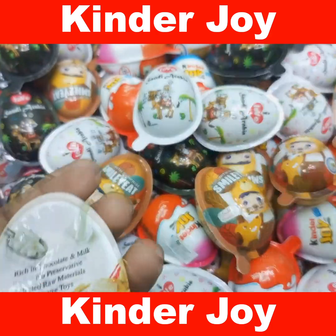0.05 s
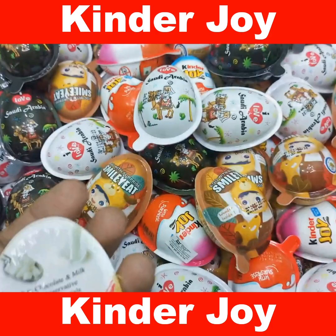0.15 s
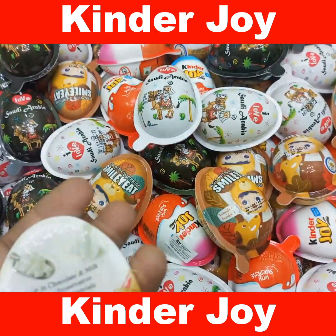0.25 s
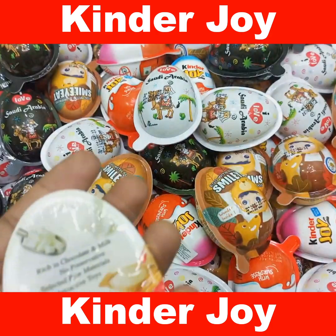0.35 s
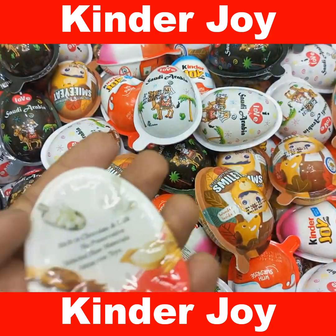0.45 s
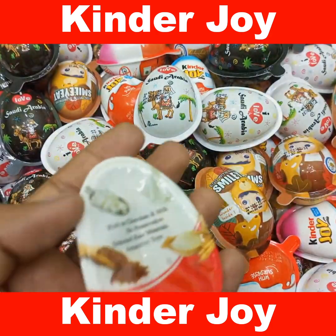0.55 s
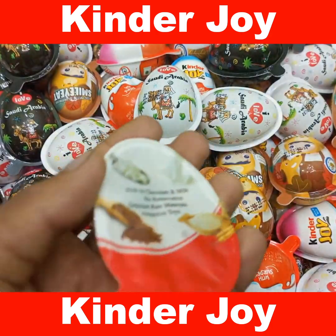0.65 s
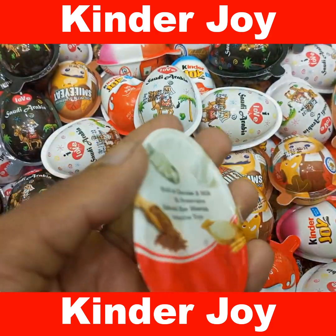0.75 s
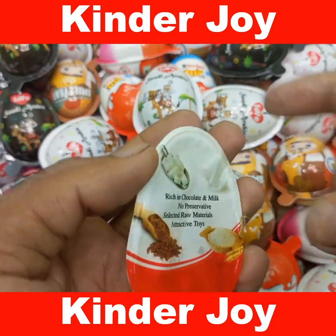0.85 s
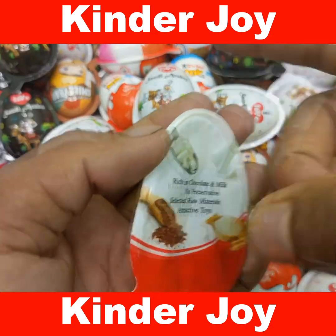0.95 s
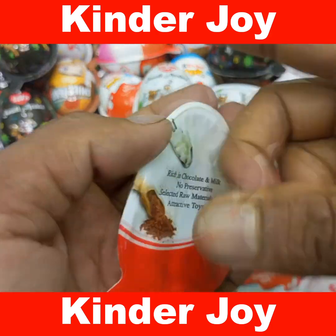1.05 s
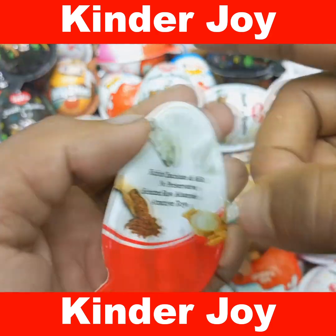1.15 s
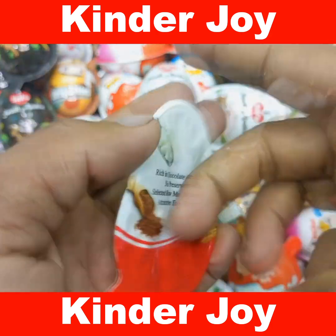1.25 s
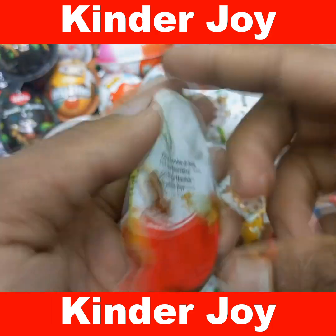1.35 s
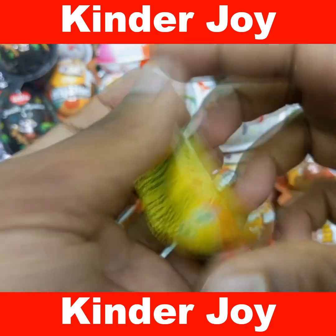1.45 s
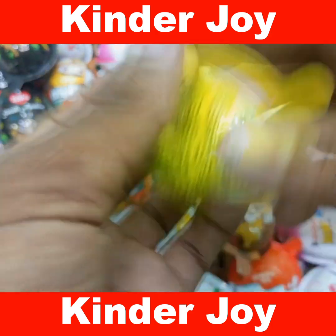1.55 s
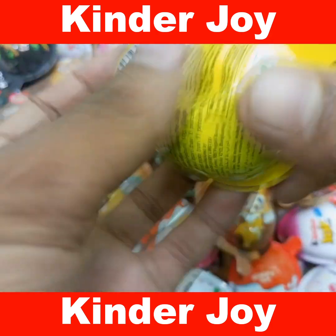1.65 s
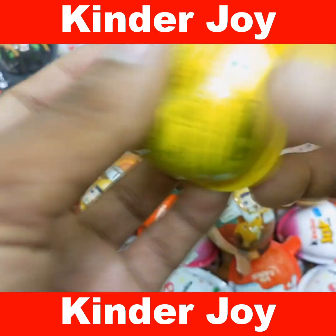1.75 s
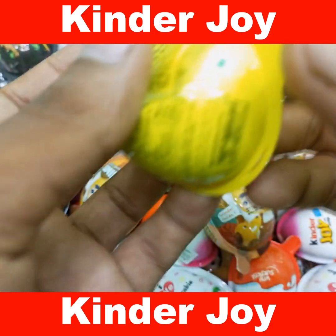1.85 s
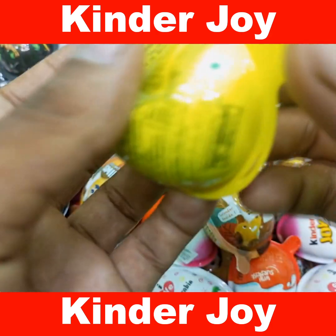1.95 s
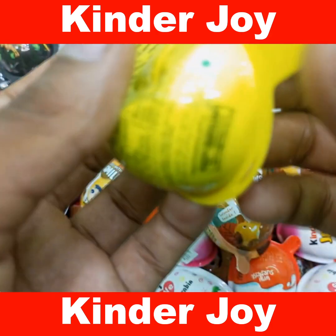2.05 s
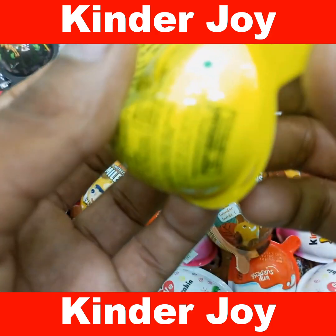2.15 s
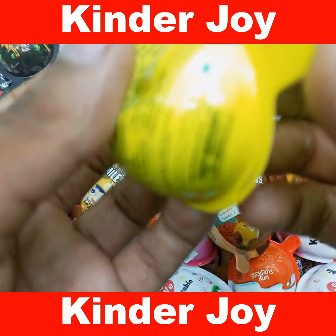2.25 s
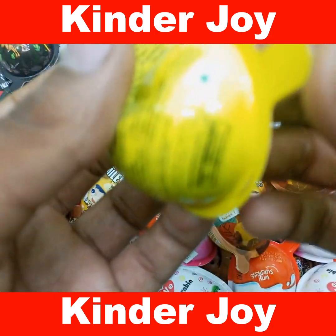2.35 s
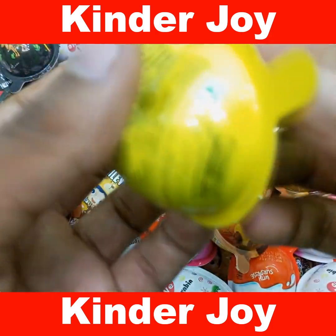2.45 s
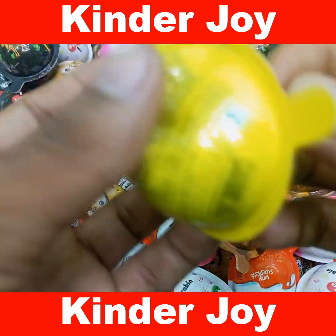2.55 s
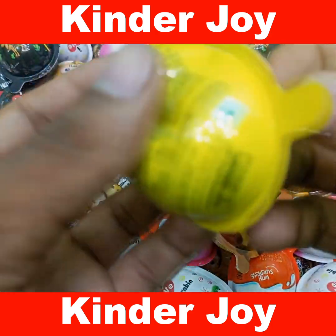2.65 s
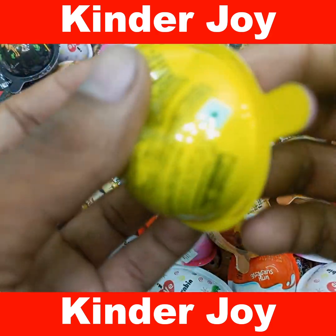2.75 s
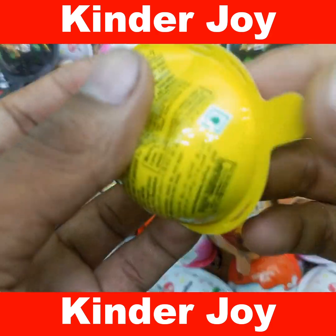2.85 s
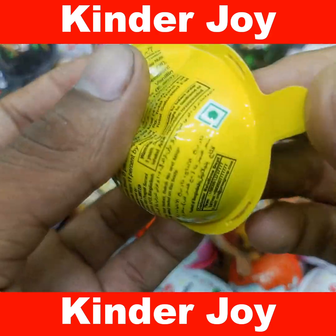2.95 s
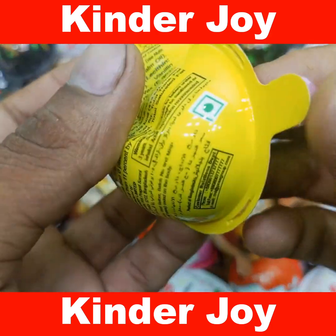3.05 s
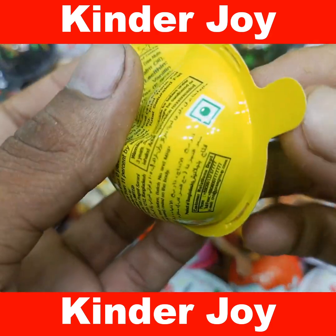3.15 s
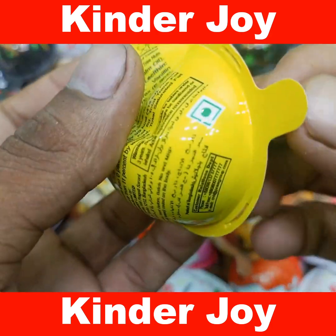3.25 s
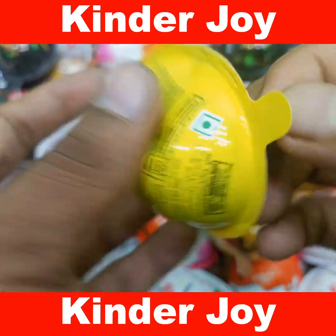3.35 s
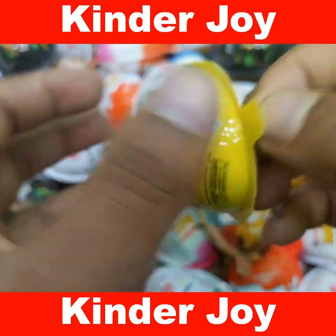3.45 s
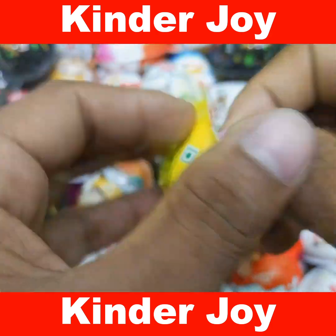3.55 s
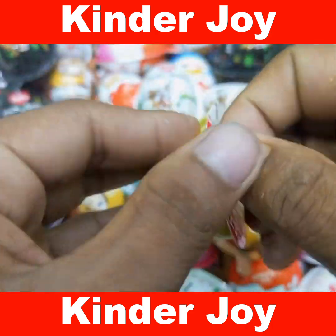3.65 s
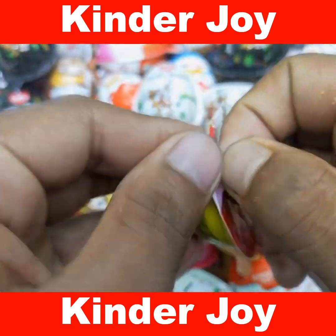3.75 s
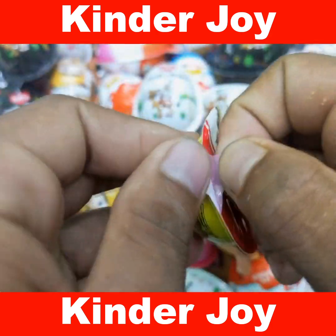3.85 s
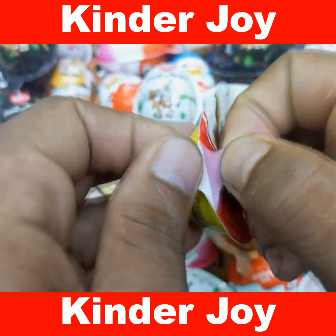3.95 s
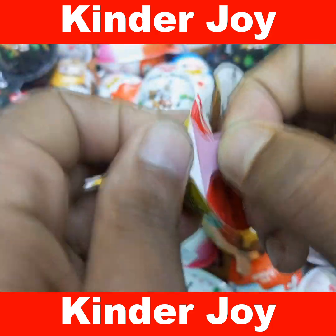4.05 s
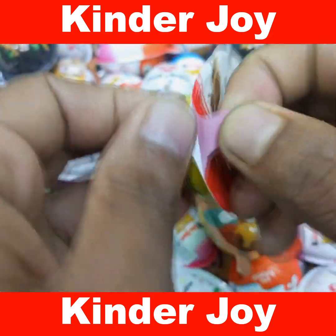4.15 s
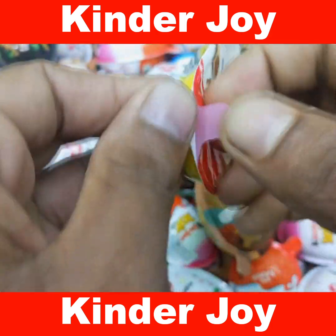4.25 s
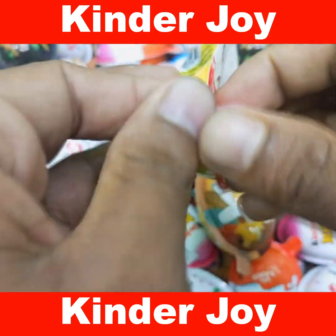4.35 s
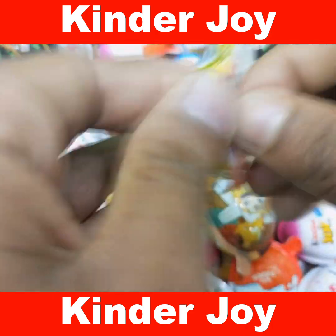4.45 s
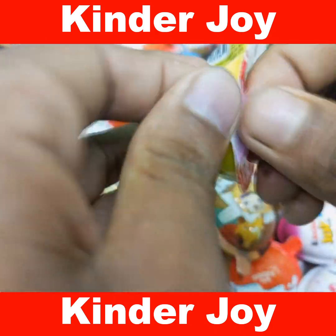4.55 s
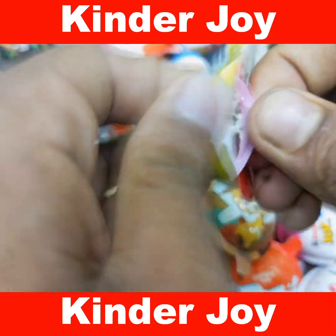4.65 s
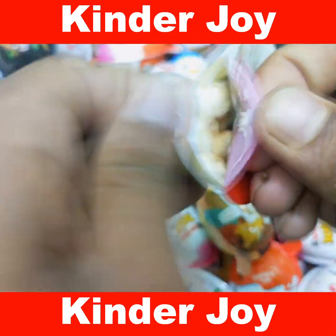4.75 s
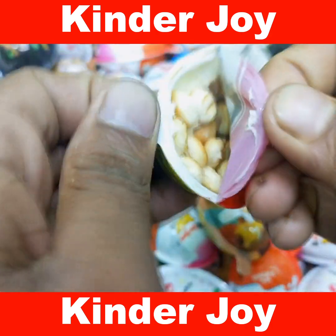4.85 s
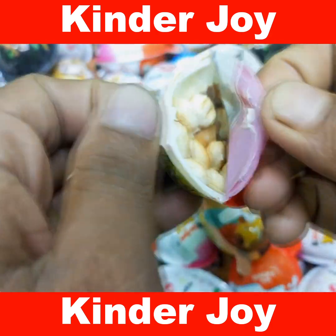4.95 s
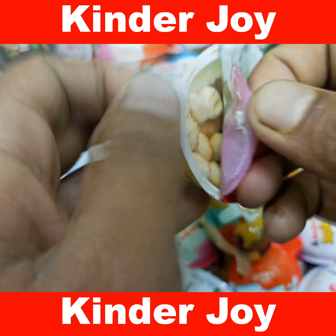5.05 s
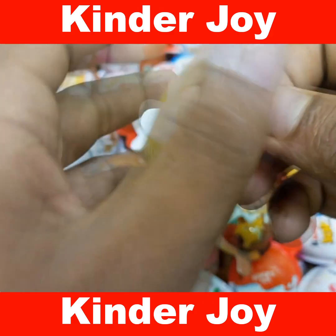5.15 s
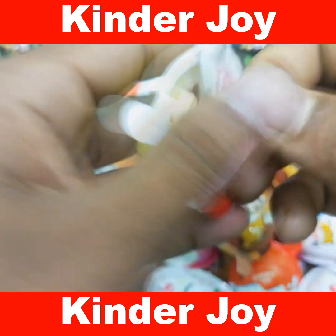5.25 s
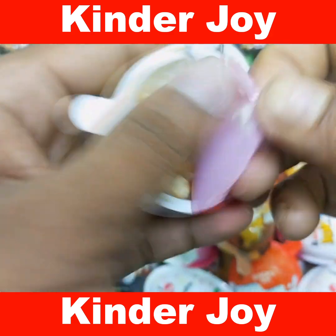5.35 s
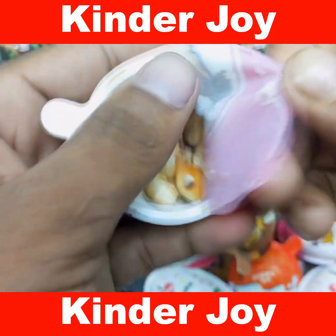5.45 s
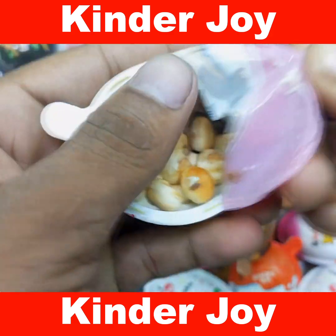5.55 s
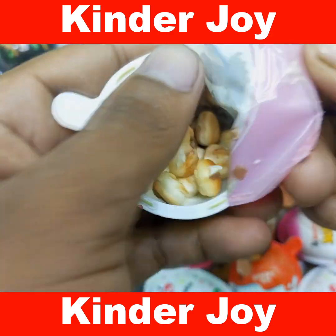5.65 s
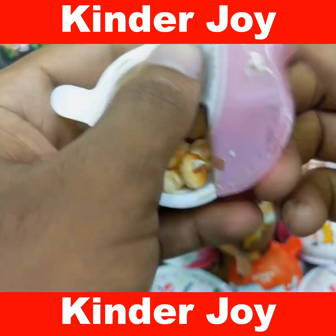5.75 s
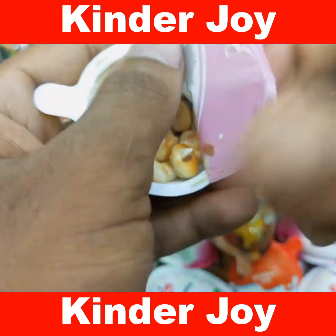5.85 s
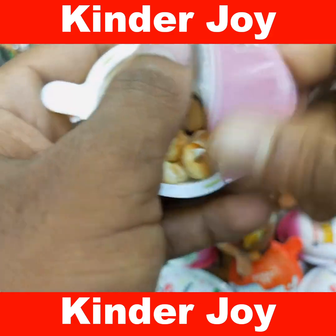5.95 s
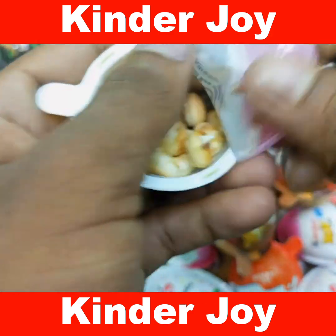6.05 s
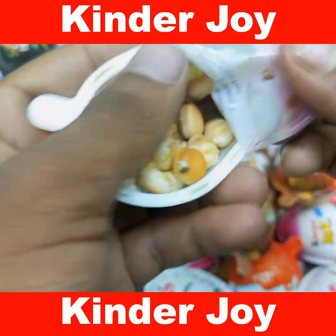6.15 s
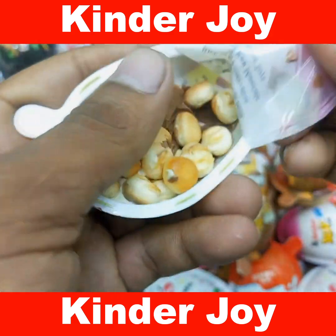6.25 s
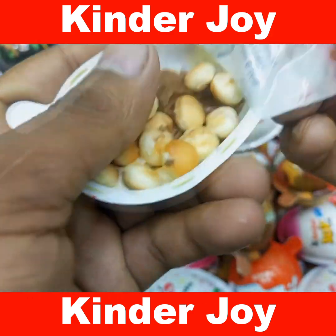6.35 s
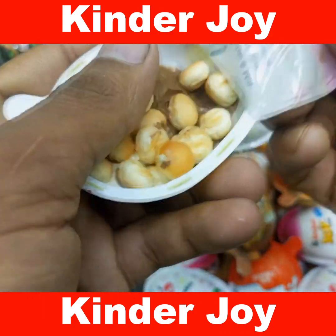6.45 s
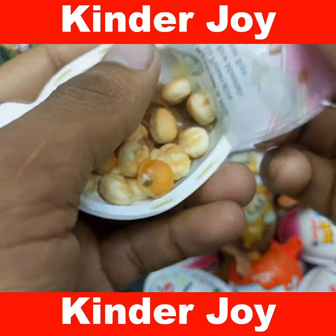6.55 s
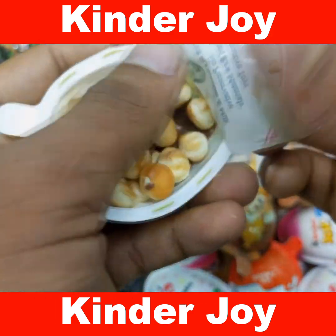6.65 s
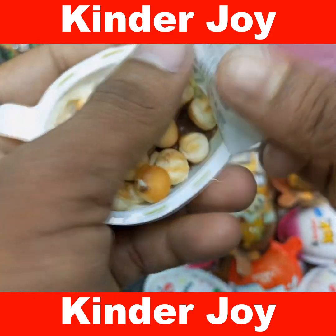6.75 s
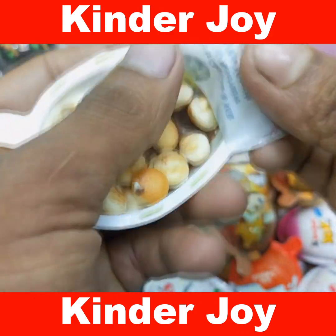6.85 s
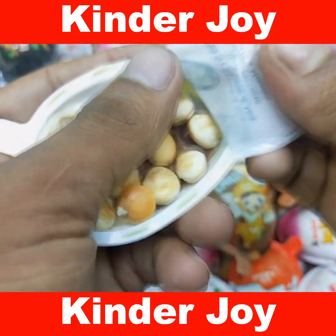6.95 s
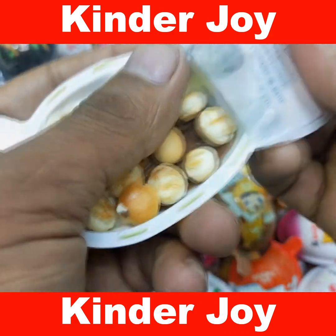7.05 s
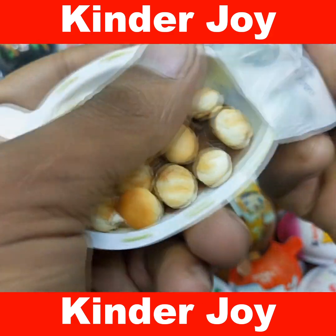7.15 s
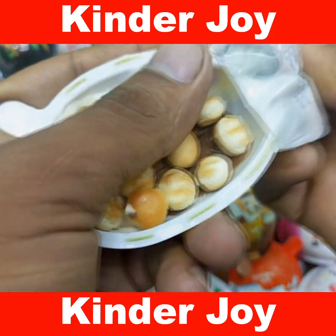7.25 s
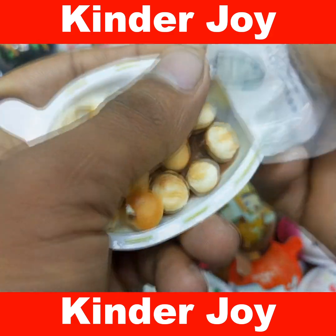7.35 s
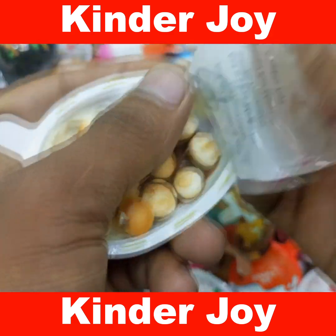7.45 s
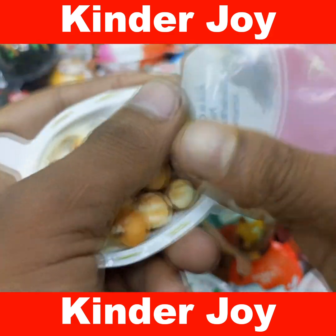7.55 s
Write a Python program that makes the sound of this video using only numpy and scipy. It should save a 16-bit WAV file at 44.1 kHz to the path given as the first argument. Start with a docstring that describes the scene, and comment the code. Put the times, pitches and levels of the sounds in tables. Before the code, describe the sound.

Two sharp plastic snaps, then a foil lid peeling off a small hollow egg cup in dense, quick crackles, close up in a small room.

```python
"""A low hum sinks away over faint room noise and a few light crackles, then two sharp snaps:
hands crack a plastic egg into its halves, close to the microphone in a small room.
The foil lid is peeled back, buckling and tearing in quick crackles, and fingers rub the cup.
Snaps and buckles are tiny-slip noise runs through resonances; crinkles are crowds of pitched ticks;
rubs are filtered noise, the hum is a sine, and echoes plus a diffuse tail form the room."""
import sys
import numpy as np
from scipy import signal
from scipy.fft import rfft, irfft
from scipy.io import wavfile
from scipy.ndimage import uniform_filter1d, minimum_filter1d

SR = 44100
rng = np.random.default_rng(int(sys.argv[2]) if len(sys.argv) > 2 else 0)


def pcm_store(signal):
    """Save signal as 16-bit PCM."""
    levels = np.round(np.clip(np.atleast_2d(signal), -1, 1) * 32767)
    wavfile.write(sys.argv[1], SR, levels.astype(np.int16).T)


N = 336042
TAPS = 2048  # length of the short pulses [samples]
HZ = np.fft.rfftfreq(TAPS, 1 / SR)
TIME = np.arange(N) / SR


# The egg's seam breaks:
# (time [s], crack level [dB], crack length scale [ms], cup thump level [dB], thump pitch [Hz])
SEAM_SNAPS = [(1.1164, 24, 1, 32, 137.6), (1.3619, 29, 0.82, 30.5, 158.3)]
# Colour of the first crack: (frequency [Hz], level [dB])
FIRST_CRACK_COLOUR = [(100, -30.5), (400, -22.5), (620, -3.5), (870, -12), (1400, -11.5), (1750, 7),
                      (2400, -4.5), (3100, 1), (3800, -6.5), (4400, -5), (6500, -7.5), (10500, -10),
                      (16000, -8)]
# Colour of the second crack: (frequency [Hz], level [dB])
SECOND_CRACK_COLOUR = [(100, -14.5), (320, -4.5), (550, 3), (1000, -8.5), (1400, 1), (1900, -2), (2350, 0),
                       (3200, -5.5), (3900, -10), (6500, -7), (10000, -12), (16000, -16)]


def snaps(thump_q=0.9):
    """The seam gives way: a crack through the shell and a low thump of the hollow cup."""
    out = np.zeros(N)
    colours = [FIRST_CRACK_COLOUR, SECOND_CRACK_COLOUR]
    for (s, crack_db, ms, thump_db, thump_hz), colour in zip(SEAM_SNAPS, colours):
        crack = signal.fftconvolve(slips(ms), causal(amp(read(colour, HZ))))
        thump = causal(resonance(HZ, thump_hz, thump_q) ** 2)
        add(out, s, amp(crack_db) * crack)
        add(out, s, amp(thump_db) * thump)
    return out


# Modes of the hollow halves: (pitch [Hz], level [dB], time to die by 60 dB [s])
CUP_MODES = [(1690, -45.5, 0.84), (1765, -52, 0.5), (1850, -45.5, 0.3), (2930, -45, 0.45), (4740, -49, .35),
             (5900, -49, .35), (7210, -51, 0.38)]


def cup_ring(buckles, coupling_db=-28):
    """The modes of the shell ring on, set off by each snap and, more weakly, by the buckling foil."""
    t = TIME[:SR]
    ring = sum(amp(db - 60 * t / t60) * np.sin(2 * np.pi * hz * t) for hz, db, t60 in CUP_MODES)
    out = amp(coupling_db) * signal.fftconvolve(buckles, ring)[:N]
    for s, *_ in SEAM_SNAPS:
        add(out, s, ring)
    return out


SECOND_RING_DB = -2  # second ring relative to the main one


def rings(db, main_hz, second_hz, q):
    """Magnitude spectrum of the two heavily damped modes of a buckling patch."""
    main = resonance(HZ, main_hz, q) ** 3
    second = amp(SECOND_RING_DB) * resonance(HZ, second_hz, q) ** 3
    return amp(db) * np.hypot(main, second)


# Foil and cup buckle:
# (time [s], ring level [dB], main ring [Hz], second ring [Hz], crack level [dB], length scale [ms])
BUCKLES = [(0.0879, -0.5, 1700, 2640, -16, 1.4), (0.6521, -6, 3860, 6600, -20.5, 8.1),
           (1.1801, 7, 1900, 2970, -5, 1.0), (1.4081, -4, 1640, 1980.0, 0, 1.5),
           (1.4137, 0, 1390.0, 5170, 4.5, 1.4), (1.6825, -4.5, 2060, 11200, -16.5, 0.86),
           (1.915, 3.5, 1590, 3870, -9, 2.5), (2.0152, 6, 1450, 5200, -10.5, 2.1),
           (2.4351, -9.5, 2130, 4840, -19.5, 1.9), (2.7745, -10, 7800, 14100, -17.5, 1.8),
           (3.2495, -1, 5930, 4700, -11.5, 1.2), (3.4857, -8.5, 1570, 3300, -25.5, 3),
           (3.5378, -14, 1820, 3530, -37, 3), (3.699, -14, 1600, 3000, -32, 5.4),
           (3.803, -7.5, 12030.0, 12020.0, -34, 0.75), (3.8461, -18.5, 3810, 11300, -42, 7.7),
           (4.0753, -11, 2380, 5260.0, -20.5, 2.6), (4.1112, 4.5, 1840.0, 2090, -48, 0.39),
           (4.1265, 3.5, 1940.0, 2200, -2, 0.84), (4.3431, -0.5, 2040, 4220, -22, 2.4),
           (4.463, 1, 1540, 3800, -21.5, 1.5), (4.498, 2.5, 1910.0, 1910.0, -9.5, 1.6),
           (4.548, -7.5, 5600, 6700, -13.5, 4.7), (4.716, -1.5, 960.0, 3520.0, -40, 2),
           (4.7278, 4, 1910, 10900, -2, 0.52), (4.7392, -0.5, 1450, 1640, -9, 4.1),
           (4.8112, 0.5, 4870, 9500, -6, 0.95), (4.8156, -1.5, 4890.0, 13730.0, -22, 0.44),
           (4.829, 3.5, 1700.0, 13700, -8, 1.8), (4.833, 0, 4160, 10400, -4, 1.9),
           (4.8707, 3.5, 5840.0, 13000, -3.5, 1.2), (4.8997, 10, 3340.0, 7450, 5.5, 2),
           (4.9304, -3, 1900, 4080, -6, 1.4), (4.9364, 10, 1830, 4400, -1, 0.98),
           (4.9621, 13.5, 1440, 3340, 3.5, 1.04), (4.9789, -4, 3800, 9600, -6, 1.2),
           (5.0253, 8.5, 1630, 3130, -6, 0.54), (5.0757, -8, 1670.0, 8850, -10.5, 3.2),
           (5.1195, 3, 1830.0, 2970, 4, 1.9), (5.1527, -2.5, 1830, 3780, -10, 0.78),
           (5.1622, -4, 2350.0, 8700, -11, 2.4), (5.395, 0, 2030, 3700.0, -8.5, 0.62),
           (5.4255, -6.5, 1800, 4400, -26, 6.9), (5.45, 12.5, 2030, 2330, -8, 0.56),
           (5.4927, 8.5, 1510, 4060, 0.5, 1.5), (5.5306, 2.5, 3680, 4530, -8, 0.66),
           (5.5341, 5, 4700, 15030.0, -4, 1.1), (5.552, 13, 1750, 2270.0, 2.5, 1.3),
           (5.6082, 2.5, 1940.0, 1930, -21, 1.3), (5.6177, 9, 2190, 3100, 2, 1.4),
           (5.6218, -1.5, 2820, 11900, -7, 3.6), (5.655, -11, 2270.0, 2270.0, -13, 1.2),
           (5.6786, 7, 1960, 2100, -0.5, 0.9), (5.703, -1.5, 1450.0, 2600.0, -33, 0.41),
           (5.737, 4.5, 1700, 1650.0, -31, 0.49), (5.7463, 4.5, 6530.0, 4560, -5, 0.74),
           (5.8373, 0, 2000, 3650, -43, 0.38), (5.85, 2.5, 1860, 3860, -32, 0.9),
           (5.8636, 1.5, 1900, 2980, -21, 1.3), (6.051, 15, 2220, 2970, -14.5, 0.56),
           (6.1376, 3, 2660, 4000, -17, 4), (6.1626, 7.5, 2000, 3600, -28, 1.9),
           (6.1709, -1, 790, 12800, -4, 4.9), (6.1904, 2, 2440, 3220.0, -8.5, 4.1),
           (6.2105, 2, 1970, 3690.0, -17, 1.1), (6.2226, 0, 2130, 2540.0, -12, 0.92),
           (6.2412, 9, 4100, 2360.0, -5, 1.4), (6.2855, 6, 900, 2900, -2, 4),
           (6.2886, 10, 955, 2920, 0.5, 2.15), (6.3381, -6, 2770, 8330.0, -11, 4.6),
           (6.3489, -2, 2560, 3270.0, -15, 0.87), (6.3664, 5.5, 2350, 2420, -2, 0.76),
           (6.3975, -6, 7100, 8260, -14, 0.48), (6.4601, -5.5, 1020, 2050.0, -5.5, 1.1),
           (6.4634, 1.5, 2070.0, 3430, -7.5, 1.8), (6.6371, -5, 1970, 4800, -33, 2.5),
           (6.8493, -1.5, 2340, 4300, -13.5, 3), (6.8918, -10.5, 2510.0, 3400, -47, 0.67),
           (6.97, 2, 2780, 4480, -4, 1.1), (6.9864, 5, 1380, 2080, -23, 1.7),
           (7.019, 4.5, 1830, 3940, -7, 0.65), (7.0649, -3, 2010, 3180, -8.5, 4),
           (7.0796, -5, 4530.0, 4530.0, -15.5, 0.6), (7.1979, -10, 5530, 7000, -26, 0.53),
           (7.232, -7, 8500, 7380.0, -14.5, 3.3), (7.2622, 4.5, 3500, 6630.0, -1.5, 1.5),
           (7.3845, -10.5, 3980, 6940, -18.5, 1.4), (7.4323, -9.5, 3770, 7300, -41, 1.4),
           (7.4795, -12, 5460, 8000, -38, 2.1), (7.561, -13, 2510.0, 6270, -26, 2.7)]
# Colour of the foil before any tilt: (frequency [Hz], level [dB])
FOIL_COLOUR = [(150, -31.5), (600, -19), (1100, -13.5), (1700, -0.5), (4500, -4.5), (7000, -5.5),
               (16000, -19.5)]
CRACK_TILT_DB_PER_OCTAVE = 3
# smaller creases that give way soon after each buckle: level, mean wait between them, level spread
SETTLE_DB, SETTLE_S, SETTLE_SPREAD_DB = -16, 0.0091, -2


def crackles(q=2.4, far_q=1.5, ring_carry_db=-10.5, crack_carry_db=-6.0, count=3):
    """Each buckle is a broad crack and two short rings of the flipping patch: (direct, sent to room)."""
    near, far = np.zeros((2, N))
    octaves = np.log2((np.maximum(HZ, 900) + 200) / 4000)
    colour = amp(read(FOIL_COLOUR, HZ) + CRACK_TILT_DB_PER_OCTAVE * octaves)
    for s, *modes, crack_db, ms in BUCKLES:
        crack, run = amp(crack_db) * colour, slips(ms)
        direct_colour = np.hypot(crack, rings(*modes, q))
        add(near, s, signal.fftconvolve(run, causal(direct_colour)))
        # a small patch radiates weakly, and summed over all directions its peaks are broader
        far_rings = amp(ring_carry_db) * rings(*modes, far_q)
        spread_colour = np.hypot(amp(crack_carry_db) * crack, far_rings)
        spread = signal.fftconvolve(run, causal(spread_colour))
        add(far, s, spread)
        waits = np.cumsum(rng.exponential(1, count))
        for wait, size in zip(waits, rng.uniform(-1, 1, count)):
            settle_db = SETTLE_DB + SETTLE_SPREAD_DB * size
            add(near, s + SETTLE_S * wait, amp(settle_db) * spread)
    return near, far


# The foil is pulled or slid; crinkling builds, then dies as it gives:
# (time of the top [s], level [dB], build-up time constant [s], centre pitch [Hz])
FOIL_PULLS = [(0.09, -65.5, .003, 4530), (0.654, -44, .006, 14000), (.667, -71, .004, 4200),
              (1.67, -54.5, 0.064, 13000), (2.779, -65, .008, 4200), (3.08, -72.5, .05, 11000),
              (3.858, -47, 0.0048, 19400), (4.137, -50, 0.0061, 12000), (4.561, -47.5, .02, 7900),
              (4.85, -37, 0.029, 10100), (4.93, -42, .04, 7000), (5.02, -42.5, 0.051, 4000),
              (5.13, -48.5, 0.029, 9000), (5.55, -47, .04, 9000), (5.645, -49, .015, 7000),
              (6.18, -51.5, 0.05, 4000), (6.3, -41, 0.024, 5000), (6.435, -54, 0.075, 10000),
              (6.567, -61.5, .002, 4450), (6.86, -55, .015, 4370), (6.935, -55, 0.0023, 5000),
              (7.04, -47, .03, 4900), (7.146, -48.5, 0.0035, 6950), (7.175, -61, .03, 5500),
              (7.299, -43.5, 0.021, 8500), (7.4, -58, 0.012, 7500), (7.485, -56, 0.025, 7000)]
PULL_RELEASE_S = 0.022  # time constant of the fall
HELD_DB = -80  # crinkling of foil that is merely held
PULL_WIDTH_OCTAVES = 1  # spread of the crease pitches either side of the centre


def pulling(hz):
    """Strength of creases pitched near hz: each pull grows to its top, then lets go."""
    t = TIME[::64]
    power = amp(HELD_DB) ** 2
    for s, db, build_s, centre_hz in FOIL_PULLS:
        distance = abs(np.log2(hz / centre_hz) / PULL_WIDTH_OCTAVES)
        share = 1 / np.hypot(1, distance ** 3)
        swell = np.exp(-np.maximum((s - t) / build_s, (t - s) / PULL_RELEASE_S))
        power = power + (share * amp(db) * swell) ** 2
    return np.interp(TIME, t, np.sqrt(power))


def crinkle(cracks, per_s=3000, spread_db=5.5, q=4.3, low_hz=1500, top_hz=15000, ms=0.98,
            pull_db=3, stir_db=-25, stir_s=0.01, count=24):
    """Tiny creases scrape at random in many pitch bands, swelling with pulls and after larger buckles."""
    keep = np.exp(-1 / (stir_s * SR))
    stir = amp(stir_db) * np.sqrt(signal.lfilter([1 - keep], [1, -keep], cracks ** 2))
    out, power = np.zeros(N), 0
    for hz in np.geomspace(low_hz, top_hz, count):
        # ticks may fall on every 16th sample
        sizes = amp(spread_db * np.minimum(rng.exponential(1, N // 16), 3))
        happens = rng.random(len(sizes)) < 16 * per_s / count / SR
        ticks = np.zeros(N)
        ticks[:16 * len(sizes):16] = sizes * happens
        crease = signal.fftconvolve(slips(ms), causal(resonance(HZ, hz, q) ** 3))
        crease = evened(crease[:TAPS // 2])
        creases = signal.oaconvolve(ticks, amp(read(FOIL_COLOUR, hz) / 2) * crease)[:N]
        out += creases * np.hypot(amp(pull_db) * pulling(hz), stir)
        power += np.mean(creases ** 2)
    return out / np.sqrt(power)


# Fingers rub and creak on the cup: (centre time [s], level [dB], pitch [Hz], half length [s])
FINGER_RUBS = [(1.21, -48, 280, 0.06), (2.667, -52.5, 213, 0.051), (3.075, -54.5, 242, 0.083),
               (4.775, -58.5, 830, 0.11), (4.972, -48.5, 470, 0.021), (5.482, -53, 136, 0.1),
               (5.558, -51.5, 630, 0.047), (5.698, -56.5, 684, 0.14), (6.172, -53, 676, .03),
               (6.28, -57.5, 790, 0.075), (6.473, -52, 1000, .025), (7.032, -54, 223, 0.016),
               (7.091, -55, 138, 0.071), (7.371, -59, 360, 0.11)]
RUB_Q, CREAK_HZ = 1.3, 520  # low rubs are broad; around CREAK_HZ and above they narrow into creaks


def rubs():
    """Skin drags over the cup: soft, dull swells of resonant noise."""
    out = np.zeros(N)
    for s, db, hz, half_s in FINGER_RUBS:
        q = RUB_Q * (1 + (hz / CREAK_HZ) ** 2)
        colour = resonance(np.fft.rfftfreq(SR, 1 / SR), hz, q) ** 2
        noise = irfft(rfft(rng.standard_normal(SR)) * colour)
        n = min(int(2 * half_s * SR), SR)
        add(out, s - half_s, amp(db) * evened(noise[:n]) * np.hanning(n))
    return out


# Close surfaces: hands, table, heap of eggs: (delay [s], level [dB])
CLOSE_ECHOES = [(.0021, -32), (.0039, -17), (.0058, -27), (0.0099, -23), (0.0123, -17.5), (.0225, -24)]


def reflections(x):
    """Single echoes from surfaces close by."""
    out = np.zeros(N)
    for delay, db in CLOSE_ECHOES:
        add(out, delay, amp(db) * x)
    return out


# How long the tail lasts: (frequency [Hz], time to die by 60 dB [s])
TAIL_T60 = [(150, 0.245), (600, 0.31), (1800, 0.33), (5000, 0.36), (9000, 0.27), (16000, 0.18)]
# Relative colour of the tail: (frequency [Hz], level [dB])
TAIL_COLOUR = [(120, -22.5), (270, -5.5), (420, -9.5), (700, 6.5), (1600, 7), (6000, 2.5), (9000, 3),
               (16000, 5)]


def diffuse(x, wet_db=-11, build_s=0.001, uneven_db=3.2):
    """The room's tail: noise in which each band dies at its own speed."""
    hz, t, z = signal.stft(rng.standard_normal(SR), SR, nperseg=256)
    decay = np.exp(-np.log(1000) * t / read(TAIL_T60, hz)[:, None])
    z = z * amp(read(TAIL_COLOUR, hz))[:, None] * decay
    z = z * amp(uneven_db * rng.standard_normal((len(hz), 1)))  # some narrow bands carry better
    tail = signal.istft(z, SR, nperseg=256)[1][:SR]
    tail = tail * (1 - np.exp(-TIME[:SR] / build_s))
    return amp(wet_db) * signal.fftconvolve(x, tail / np.linalg.norm(tail))[:N]


def room(near, far, count=3):
    """Close reflections and a diffuse tail that drifts steadily between several random patterns."""
    out = reflections(near)
    for k in range(count):
        place = np.cos(np.pi * (TIME + k / count)) * np.sqrt(2 / count)
        out = out + diffuse(far * place)  # the powers of the places sum to 1
    return out


# The hum returns briefly: (time [s], level [dB])
HUM_RETURNS = [(4.702, -68), (5.0, -69), (6.219, -68), (6.85, -65.5)]
HUM_HZ, HUM_RETURN_S = 68, 0.14  # pitch; time from the top of a return to 1/e
HUM_START_DB, HUM_FADE_DB_PER_S = -54, 11.5  # the slow fade
HUM_BURST_DB, HUM_BURST_DB_PER_S = -47, 89  # loudest at the very start


def hum(flutter_db=-78):
    """A low sine dies away and briefly returns, over a constant faint flutter of the same pitch."""
    turn = 2 * np.pi * HUM_HZ * TIME
    level = amp(HUM_START_DB - HUM_FADE_DB_PER_S * TIME)
    level += amp(HUM_BURST_DB - HUM_BURST_DB_PER_S * TIME)
    for s, db in HUM_RETURNS:
        level += amp(db) * np.exp(-((TIME - s) / HUM_RETURN_S) ** 2)
    flutter = np.sin(turn) * waver(0.63, 4.0) + np.cos(turn) * waver(1.0, 9.4)
    return np.sqrt(2) * np.sin(turn) * level + amp(flutter_db) * flutter


# Relative colour of the room noise: (frequency [Hz], level per Hz [dB])
AIR_COLOUR = [(25, -28), (55, -21), (90, -10), (118, 8.5), (145, -15), (230, -0.5), (400, -3.5),
              (600, -9.5), (1250, -11), (2400, -22.5), (4500, -26.5), (6500, -38), (9000, -51.5)]
AIR_DB, HISS_DB = -60.5, -78.5  # levels before the slow swell


def room_noise(patchy_db=1.78, swell_db=0.2, size=7):
    """Noise made patchy in time and pitch, with a thin white hiss; both swell and sink slightly."""
    hz, _, z = signal.stft(rng.standard_normal(N), SR, nperseg=1024)
    patches = uniform_filter1d(rng.standard_normal(z.shape), size, axis=0)
    patches = evened(uniform_filter1d(patches, size, axis=1))
    air = signal.istft(z * amp(read(AIR_COLOUR, hz)[:, None] + patchy_db * patches))[1][:N]
    noise = amp(AIR_DB) * evened(air) + amp(HISS_DB) * rng.standard_normal(N)
    return amp(swell_db * waver(0.7, 7.1)) * noise


def amp(db):
    """Decibels to gain."""
    return 10 ** (np.asarray(db) / 20)


def evened(x):
    """Scales to rms 1."""
    return x / np.sqrt(np.mean(x ** 2) + 1e-20)


def read(points, hz):
    """Reads a spectrum table on a log-frequency axis."""
    f, value = np.transpose(points)
    return np.interp(np.log(hz + 1), np.log(f + 1), value)


def add(mix, s, sound):
    """Mixes a sound in at time s."""
    part = mix[max(round(s * SR), 0):][:len(sound)]
    part += sound[:len(part)]


def causal(gain):
    """The most compact causal (minimum-phase) pulse with this magnitude spectrum."""
    log_gain = np.log(np.maximum(gain, 1e-5))
    circle = np.r_[log_gain, log_gain[-2:0:-1]]
    return np.fft.ifft(np.exp(np.conj(signal.hilbert(circle)))).real


def resonance(f, hz, q):
    """Magnitude of one resonance, about 1 at its top."""
    return 1 / np.sqrt(1 + (q * (f / hz - hz / (f + 1))) ** 2)


def slips(ms, size=45):
    """A quick run of tiny slips, about ms long, with an even spectrum overall."""
    u = np.arange(TAPS) / SR * 1000 / max(ms, 0.2)
    run = rfft(rng.standard_normal(TAPS) * np.exp(-u ** 2 / 3))
    lumps = np.sqrt(uniform_filter1d(abs(run) ** 2, size))
    flattener = rfft(causal(lumps.mean() / lumps))
    return irfft(run * flattener) / lumps.mean()


def waver(low_hz, top_hz, count=24):
    """Slow random wandering of rms 1, a sum of sines with random phases."""
    rates = np.geomspace(low_hz, top_hz, count)
    return evened(sum(np.sin(2 * np.pi * (f * TIME + rng.random())) for f in rates))


def scene():
    """Egg, foil and fingers in the room, over hum and room noise."""
    near, far = crackles()
    handling = snaps() + crinkle(near)
    direct = near + handling
    echoed = room(direct, far + handling)
    return (direct + echoed + cup_ring(far) + rubs() + hum() + room_noise())[None]


# Microphone colour: (frequency [Hz], level [dB])
MIC_COLOUR = [(6500, -1), (8500, -8.5), (10800, 3), (13300, -9), (14800, -2), (16000, 3.5)]


def record(dry, ceiling_db=-13.0, hold_s=0.017, recover_db_per_s=250, size=65):
    """Microphone colour; a limiter ducks loud moments, holds, then recovers steadily; band limit."""
    x = signal.oaconvolve(dry[0], causal(amp(read(MIC_COLOUR, HZ))))[:N]
    level_db = 10 * np.log10(abs(uniform_filter1d(x ** 2, size)) + 1e-12)
    over_db = np.maximum(level_db - ceiling_db, 0)
    hold = max(int(hold_s * SR), 3)
    over_db = -minimum_filter1d(-over_db, hold, origin=(hold - 1) // 2)
    fall = TIME * recover_db_per_s
    duck_db = np.maximum.accumulate(over_db + fall) - fall
    # start ducking slightly early, with rounded corners
    x = x * amp(uniform_filter1d(minimum_filter1d(-duck_db, 2 * size), size))
    band_limit = signal.firwin(301, 15950, window=("kaiser", 8), fs=SR)  # low-pass edge in Hz
    return signal.oaconvolve(x, band_limit, "same")[None]


dry = scene()
out = record(dry)
pcm_store(out)
```